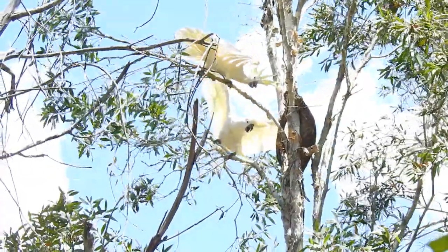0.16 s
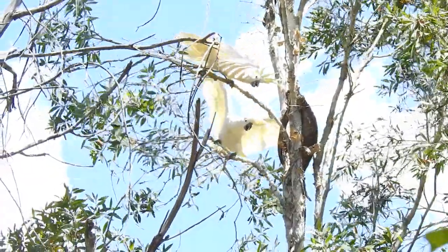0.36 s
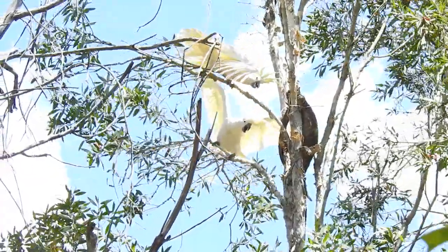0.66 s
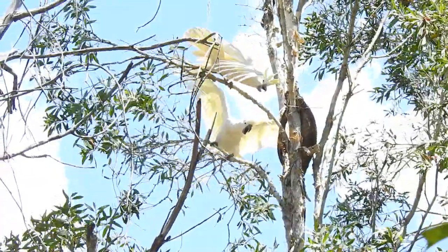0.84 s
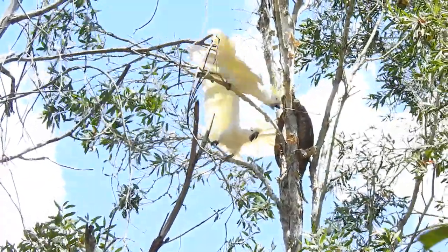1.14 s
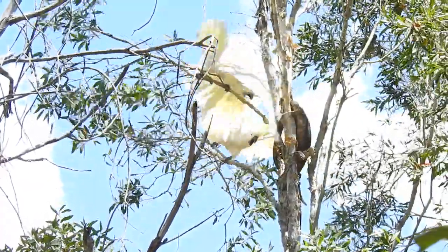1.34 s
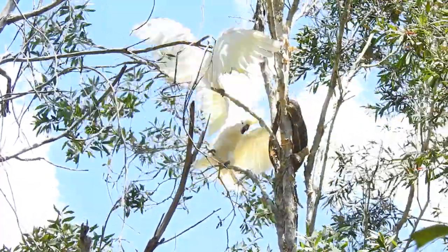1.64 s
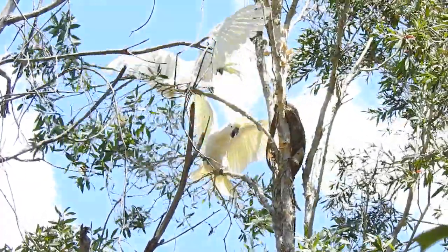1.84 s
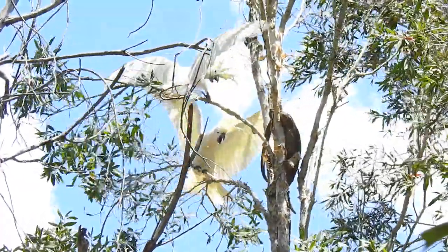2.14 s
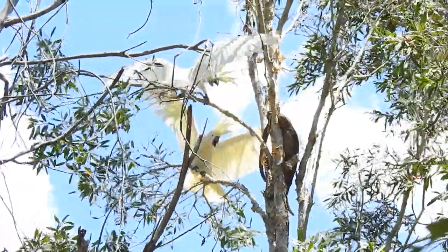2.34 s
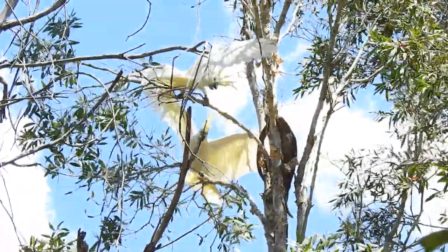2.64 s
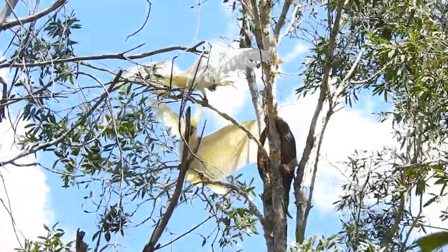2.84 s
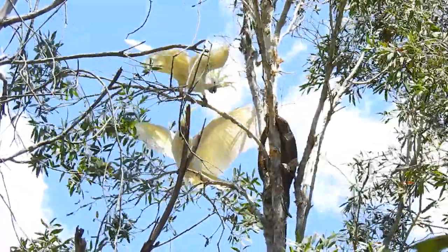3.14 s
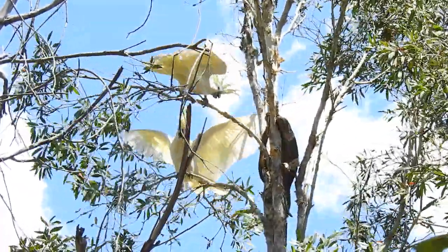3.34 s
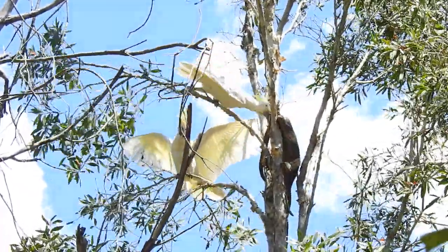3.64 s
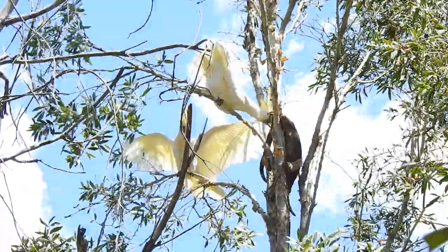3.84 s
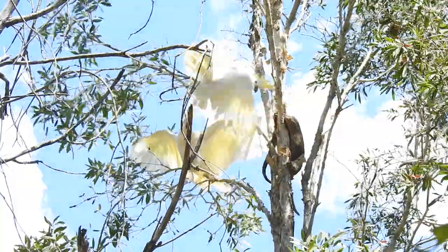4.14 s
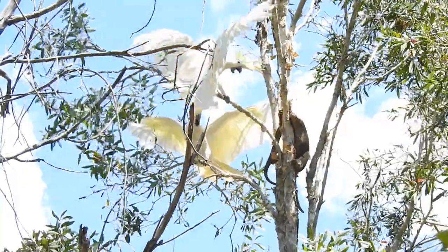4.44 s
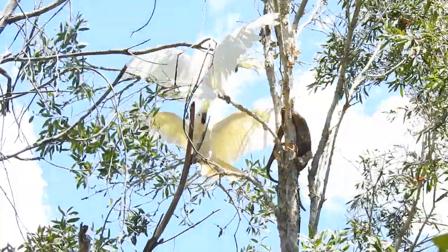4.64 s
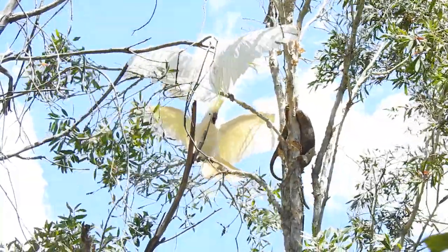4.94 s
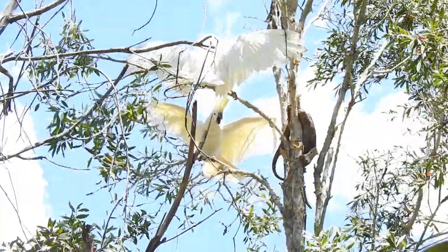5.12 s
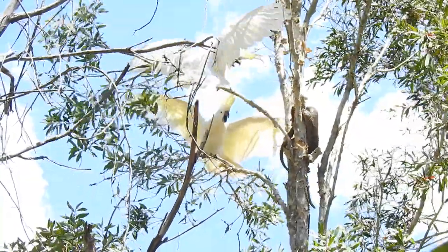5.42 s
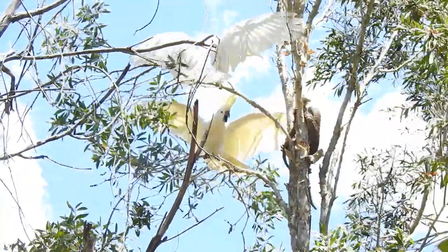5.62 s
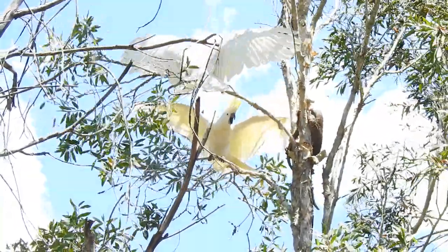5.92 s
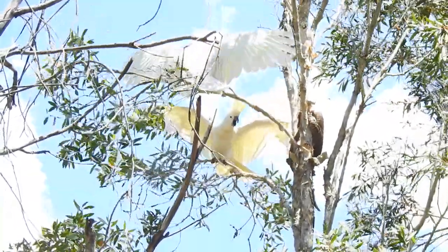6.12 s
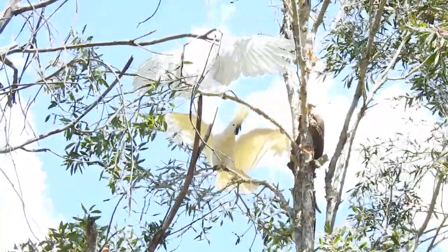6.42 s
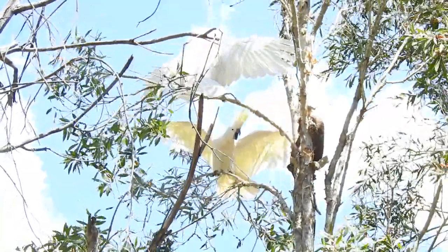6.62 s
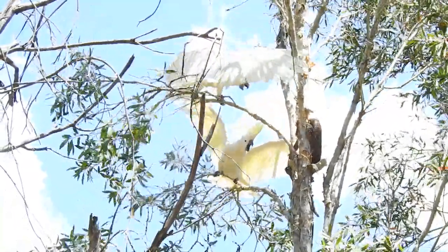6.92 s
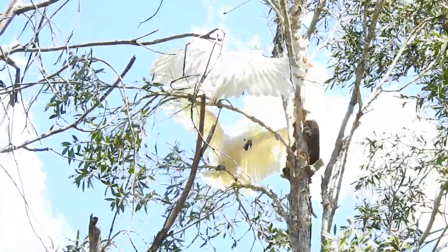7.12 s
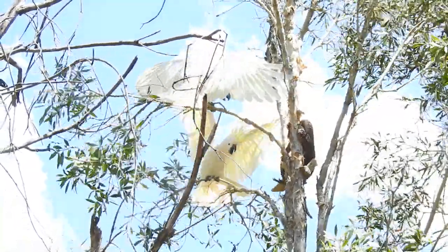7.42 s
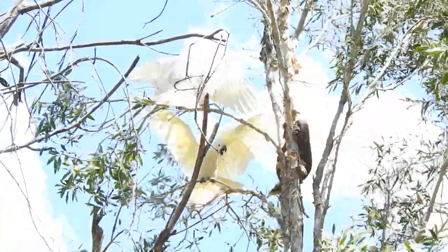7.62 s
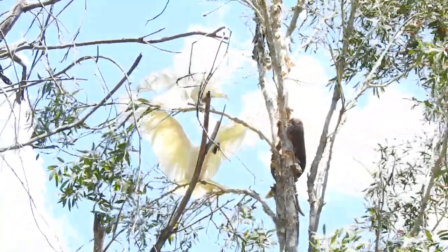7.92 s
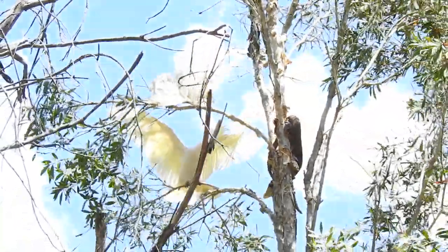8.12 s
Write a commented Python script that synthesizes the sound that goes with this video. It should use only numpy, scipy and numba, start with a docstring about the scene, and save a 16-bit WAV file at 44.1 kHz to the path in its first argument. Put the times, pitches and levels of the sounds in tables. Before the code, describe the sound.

Cockatoos screech loudly in a wood, slightly to the left, with a light echo. A cry cuts off just after the start. From about 0.7 to 3.3 seconds come three harsh screeches back to back, each about a second or less; the first has a duller buzz dipping and rising under it, and the third is a coarser rattle. In the lull, a twig snaps faintly at 4.1 seconds. The longest screech runs from 4.2 to 6.1 seconds, followed by a tiny rasp and two more screeches, from 6.3 to 7.4 and from 7.4 to 8.3 seconds. The calls start with a quick rattle, turn ragged and shrill, and sometimes tighten into a pitched buzz. Faint, distant insect hiss continues throughout. A light breeze rumbles on the microphone, with a few soft bumps between 1.4 and 3.2 seconds.

```python
"""Cockatoos screeching in a wood

Cockatoos screech from a tree at an animal on the trunk. Each screech spins up from a slow rattle into
chaos and now and then locks into a buzz of about 290 snaps a second; each snap of the syrinx rings
windpipe, throat and beak. A breeze buffets the microphone, a twig snaps, the wood echoes, insects hiss
far off, and the loudest peaks overload the microphone."""
import sys
import numpy as np
from scipy import signal
from scipy.fft import rfft, irfft
from scipy.io import wavfile
from scipy.ndimage import uniform_filter1d
from numba import njit

SR = 44100
rng = np.random.default_rng(int(sys.argv[2]) if len(sys.argv) > 2 else 0)


def master(y):
    """Save y as 16-bit WAV."""
    cut = np.clip(np.atleast_2d(y).T, -1, 1)
    pcm = np.round(cut * 32767)  # scale
    wavfile.write(sys.argv[1], SR, pcm.astype(np.int16))


N = 364266
TIME = np.arange(N) / SR

# One row a screech: start_s, end_s, attack_s, level_db, swell_db, snap_rate_hz, spin_up_s, chaos (0-1),
# throat_start_db, throat_end_db, treble_db, shrill_db, throat_scoop_hz, gap_rise_hz.
# Throat, treble and shrill ring are set against the beak band.
SCREECHES = [(-.2, 0.117, 0.028, -18, 6.5, 275.7, 0.039, 0.78, -1, -1.5, 1, -4, 0, 50),
             (.674, 1.667, 0.13, -13.5, -0.5, 302.1, .05, 0.53, -4, -1.5, -2.5, 7.5, 20, 650),
             (1.695, 2.611, 0.064, -14, -.5, 295, .09, 0.67, -3, -0.5, -2.5, 6, -54, 400),
             (2.625, 3.307, 0.084, -13, 1.2, 159.8, 0.045, .7, -2.5, -5, -4, 11.5, -60, 1300),
             (4.181, 6.11, .03, -14, 0.5, 259.8, 0.16, 0.79, 0.14, -1.9, -3.5, -9, 372, 100),
             (6.159, 6.25, 0.058, -34, 0, 258.4, .05, 0.86, -13.5, -8, -2, -5, 0, 3),
             (6.344, 7.369, 0.13, -14, 1.5, 284.4, .05, 0.76, 0.5, -2, -2.5, 5, 25, 152),
             (7.427, 8.298, 0.024, -14.5, 0, 289.7, .28, .66, -1.5, -1.5, -1.5, 4, -56, 200)]


def undb(db):
    """Decibels to gain."""
    return 10 ** (np.asarray(db) / 20)


def unit(x):
    """Scale to rms 1."""
    return x / np.sqrt(np.mean(x ** 2))


def steady(x, size=1300):
    """Hold the rms at 1 over a few dozen milliseconds; single snaps keep their punch."""
    power = uniform_filter1d(uniform_filter1d(x ** 2, size), size)
    return x / np.sqrt(power + 1e-5 * np.mean(x ** 2))


def ramp(start_s, length_s):
    """Rise from 0 to 1."""
    return np.clip((TIME - start_s) / max(length_s, 1e-3), 0, 1)


def curves(table):
    """Automation lanes: a table's columns, joined by straight lines in time."""
    times, *columns = np.transpose(table)
    return [np.interp(TIME, times, column) for column in columns]


def walk(rate_hz):
    """Smooth random modulation with a spread near 1."""
    size = int(SR / rate_hz)
    points = rng.standard_normal(N // size + 2)
    return np.interp(np.arange(N) / size, np.arange(len(points)), points)


def colour(x, points):
    """EQ through (frequency_hz, gain_db) points."""
    hz, db = np.transpose(points)
    gain_db = np.interp(np.log(np.fft.rfftfreq(N, 1 / SR) + 1), np.log(hz), db)
    return irfft(rfft(x) * undb(gain_db), N)


def cut(x, hz, kind, order=2):
    """Low-pass or high-pass."""
    return signal.sosfilt(signal.butter(order, hz, kind, fs=SR, output="sos"), x + 1e-18)


@njit
def svf(x, hz, width_hz):
    """State-variable band-pass whose centre moves."""
    y, band, low = np.empty(len(x)), 0., 0.
    for i in range(len(x)):
        g, damping = np.tan(np.pi * hz[i] / SR), width_hz / hz[i]
        v = (band + g * (x[i] + 1e-18 - low)) / (1 + g * (g + damping))
        band, low, y[i] = 2 * v - band, low + 2 * g * v, damping * v
    return y


def ring(x, hz, width_hz):
    """One resonance, still or moving."""
    return svf(x, hz * np.ones(N), float(width_hz))


def leaves_and_insects(level_db=-40):
    """An even bed of distant hiss, centred in the lows and wide in the highs."""
    # Tone of the bed: frequency_hz, gain_db
    spectrum = [(30, -21), (130, -13.5), (190, -2), (240, -11.5), (320, -4), (650, -8), (1000, -13),
                (4000, -16.5), (6500, -11), (8300, -22.5), (10800, -38), (16000, -66)]
    centre, sides = rng.standard_normal(N), rng.standard_normal((2, N))
    bed = colour(centre + cut(sides, 3400, "high", order=1), spectrum)
    return unit(bed) * undb(level_db + .5 * walk(2.3))


def wind(buffet_s=.016):
    """A breeze rumbles on each microphone port separately, with a few soft buffets."""
    # Strength of the breeze: time_s, level_db
    breeze = [(1, -53), (2.9, -47), (3.3, -48), (3.7, -59.5), (5, -53), (5.8, -57), (7, -53), (8.2, -53)]
    # Thumps of air: time_s, level_db, pitch_hz, left_minus_right_db
    buffets = [(1.44, -34.5, 148, 5), (1.68, -31, 152.6, -8), (1.73, -36, 179, -17), (1.8, -35.5, 185, -4),
               (2.49, -32, 108.3, -7), (3.06, -46, 69.6, 2.5), (3.222, -41, 78, 0)]
    ports = []
    for side in (1, -1):
        air = rng.standard_normal(N)
        rumble = unit(cut(ring(ring(air, 73, 70), 88, 160), 254, "low"))
        rumble *= undb(curves(breeze)[0] + 3.5 * walk(11))
        for time_s, db, hz, pan_db in buffets:
            swell = np.exp(-((TIME - time_s) / buffet_s) ** 2)
            thump = steady(ring(ring(air, hz, 67), hz, 130))
            rumble += undb(db + side * pan_db / 2) * swell * thump
        ports.append(rumble)
    return np.array(ports)


def wood_echo(x, t60_s=.91, tail_db=-14.5, near_db=-4.5, near_s=.01):
    """Nearby twigs scatter the sound at once; trunks further off return a long tail."""
    t = TIME[:SR]
    tail = cut(rng.standard_normal((2, SR)), 9400, "low", order=1)
    tail *= undb(-60 * t / t60_s) * (1 - np.exp(-t / .0016))
    near = cut(rng.standard_normal((2, SR)), 6900, "high") * np.exp(-t / near_s)
    response = undb(tail_db) * unit(tail) + undb(near_db) * unit(near)
    return signal.fftconvolve(x[None], response / np.sqrt(SR), axes=1)[:, :N]


def twig_snap(decay_s=.0064):
    """A twig breaks with a dry tick of bright noise."""
    # The break: time_s, level_db
    ticks = [(4.0797, -33.5)]
    crack = unit(cut(ring(rng.standard_normal(N), 5900, 2460), 7700, "low", order=4))
    return crack * sum(undb(db) * np.exp(-abs(TIME - time_s) / decay_s) for time_s, db in ticks)


def snaps(hz, chaos, jitter, shimmer_db=0):
    """One sharp pulse a cycle; chaos scatters the timing by jitter and the sizes by shimmer."""
    pulses, taps, at = np.zeros(N + 16), np.arange(-7, 9), 8.
    for stretch, size in np.clip(rng.standard_normal((4000, 2)), -2, 2):
        i = int(at)
        if i >= N:
            break
        click = np.sinc(i + taps - at) * np.hanning(len(taps))
        pulses[i + taps] += click * undb(shimmer_db * chaos[i] * size)
        at += SR / hz[i] * np.exp(jitter * chaos[i] ** 2 * stretch)
    return pulses[:N]


def second_tone():
    """A duller buzz dips and rises under the second screech."""
    # Path of the buzz: time_s, pitch_hz, level_db
    slide = [(.9, 324.5, -56), (.97, 307, -26), (1.08, 282.7, -18.5), (1.18, 266.2, -17.5),
             (1.29, 290.3, -18), (1.42, 329.2, -30)]
    hz, db = curves(slide)
    pulses = snaps(hz, chaos=np.full(N, .42), jitter=.347, shimmer_db=4)
    buzz = ring(ring(pulses, 1810, 420), 2200, 1100) + undb(-15.5) * ring(pulses, 740, 360)
    gate = (TIME > slide[0][0]) & (TIME < slide[-1][0])
    return unit(buzz) * undb(db) * gate


def lock_into_buzz(hz, chaos, lock_s=.03, break_s=.018, treble_db=-.5):
    """The syrinx locks: pitch catches first, then chaos dies down and the four bands shift in level."""
    # Locked stretches: start_s, end_s, pitch_hz, glide_hz, chaos (0-1), throat_db, beak_db, windpipe_db
    buzzes = [(0, 0.089, 285, -5.5, 0, -6.5, 2, 5), (0.814, .91, 291.9, 3.5, 0.1, 3, -1.5, 0.5),
              (0.945, 1.096, 292.1, 6, .14, 0.5, 0, 0), (1.123, 1.27, 298.6, 4.5, 0.01, -7, -0.5, -0.5),
              (1.289, 1.425, 301.6, -4.5, 0.14, -2.5, 1, -1.5), (1.809, 1.881, 286.4, 1, 0.2, -2, -0.5, 3),
              (2.09, 2.146, 296.2, -1, 0.18, 2, 1, -3), (2.289, 2.345, 295.2, 0.5, 0.18, 1, -0.5, -3),
              (3.026, 3.083, 288.3, -3.5, 0.03, -2.5, -2.5, 2.5), (4.34, 4.441, 215.7, 1, 0.15, -1, 2, 4),
              (4.731, 4.829, 291, -1, 0.39, 0.5, 0, -0.5), (4.848, 4.95, 290, 0, 0.11, -1, 0, 3),
              (4.983, 5.097, 289.1, -0.46, 0.01, -8.5, -1, 4), (6.462, 6.595, 292.2, 1.5, 0.05, 2, -3, -3),
              (6.757, 6.85, 295.8, 4, 0.16, 0.5, -.5, -0.5), (7.678, 7.726, 295, 2.5, .1, 3, 0.5, -5.5),
              (7.759, 7.848, 290.2, 1, 0.3, 2.5, -0.5, 0.5), (7.879, 8.137, 289.7, 0, 0.19, 0.5, 1, 4)]
    lanes = np.vstack([hz, chaos, np.zeros((4, N))])
    for start, end, pitch_hz, glide_hz, buzz_chaos, *lifts_db in buzzes:
        span = slice(*np.searchsorted(TIME, [start - lock_s, end + break_s]))
        grip = np.interp(TIME[span], [start - lock_s, start, end, end + break_s], [0, 1, 1, 0])
        pitch = np.interp(TIME[span], [start, end], [pitch_hz, pitch_hz + glide_hz])
        lanes[0, span] += np.minimum(2 * grip, 1) * (pitch - lanes[0, span])
        lanes[1:, span] += grip * (np.c_[[buzz_chaos, *lifts_db, treble_db]] - lanes[1:, span])
    return lanes


def syrinx(hz, chaos, rasp=1.3, hiss=.18, wobble=.04, puff_s=.0034):
    """Snaps, each followed by a puff of turbulent air; chaos shakes the pitch and feeds the puffs."""
    pulses = snaps(hz * np.exp(wobble * chaos ** 2 * walk(45)), chaos, jitter=.26)
    fade = np.exp(-1 / (puff_s * SR))
    puffs = signal.lfilter([np.sqrt(1 - fade ** 2)], [1, -fade], pulses) * rng.standard_normal(N)
    return pulses + (hiss + rasp * chaos) * puffs


def flare(x, depth=.54, rate_hz=30):
    """Narrow bands flare and sink, so shreds of tone drift through the rasp."""
    return x + depth * sum(ring(x, hz, 130) * walk(rate_hz) for hz in np.linspace(2300, 7400, num=24))


def windpipe(source, hz, chaos, db_per_octave=3.5):
    """The low body of the voice: weaker in a slow rattle, breaking up as the voice strains."""
    buzz_ring = undb(-1.5) * (1 - chaos) ** 2 * ring(source, 1450, 42)
    body = ring(source, 924, 77) + buzz_ring + undb(-7.5) * ring(source, 1258, 630)
    body = cut(cut(body, 687, "high", order=3), 5200, "low", order=1)
    flutter_db = 2.8 * np.sqrt(chaos) * walk(35)
    return steady(body) * undb(-16 + db_per_octave * np.log2(hz / 290) + flutter_db)


def throat(source, hz, chaos, core_db=2):
    """A broad resonance whose narrow core builds up as the voice clears."""
    core = undb(core_db) * (1 - chaos) * ring(source, hz, 59)
    return steady(ring(ring(source, hz, 298) + core, hz, 1370))


def formants(x, modes, quiver=.036, drift=.021):
    """Resonances that quiver alone and drift together as tongue and beak move."""
    tongue = drift * walk(5)
    return sum(undb(db) * ring(x, hz * np.exp(np.clip(tongue + quiver * walk(16), -.2, .2)), width_hz)
               for hz, width_hz, db in modes)


def beak(source, shrill_db):
    """The beak rings in the upper mids, with a narrow, shrill edge."""
    # Beak resonances: centre_hz, width_hz, gain_db
    modes = [(2628, 393, 12), (3340, 1070, 3)]
    shrill = undb(shrill_db) * ring(source, 3560 * (1 + .012 * walk(14)), 116)
    band = formants(source, modes) + shrill
    return steady(cut(cut(band, 2680, "high", order=4), 3220, "low", order=4))


def beak_treble(source, gap_hz, opening):
    """The top of the voice; the gap of the beak bites hardest as it opens."""
    # Treble resonances: centre_hz, width_hz, gain_db
    modes = [(4480, 480, 14), (4920, 1160, 9.5), (5880, 940, 8), (6460, 450, 8.5), (7840, 620, -39)]
    bite = undb(12.5 + 18 * opening) * ring(source, gap_hz, 490)
    band = formants(source, modes) + bite
    return steady(cut(cut(band, 3540, "high", order=4), 7715, "low", order=8))


def screech_envelope(tire_db=-.5, tire_s=.12, release_db_per_s=333):
    """Each screech attacks, swells or fades while held, tires and is released."""
    envelope = 0
    for start, end, attack_s, db, swell_db, *_ in SCREECHES:
        held_db = db + swell_db * (ramp(start, end - start) - .5) + tire_db * ramp(end - tire_s, tire_s)
        release_db = release_db_per_s * np.maximum(TIME - end, 0)
        envelope += ramp(start, attack_s) ** 1.12 * undb(held_db - release_db)
    return envelope


def cockatoos(rattle_hz=90.01, rattle_chaos=.3598, open_s=.042, close_s=.14, scoop_s=.088, yelp_s=.071):
    """The syrinx spins up and rings windpipe, throat and beak, which opens and closes once a screech."""
    rows = np.array(SCREECHES)
    sounding = np.maximum(np.searchsorted(rows[:, 0], TIME, side="right") - 1, 0)
    (start, end, _, _, _, rate_hz, spin_s, wildness,
     first_db, last_db, bright_db, shrill_db, scoop_hz, rise_hz) = rows[sounding].T
    age = TIME - start
    progress = np.clip(age / (end - start), 0, 1)
    rattle, opening = np.exp(-age / spin_s), np.exp(-age / open_s)
    closing = np.exp(-np.maximum(end - TIME, 0) / close_s)

    hz = rate_hz + (rattle_hz - rate_hz) * rattle
    chaos = wildness + (rattle_chaos - wildness) * rattle
    hz, chaos, throat_db, beak_db, pipe_db, treble_db = lock_into_buzz(hz, chaos)
    chaos = chaos.clip(0, 1)

    throat_hz = 2036 + scoop_hz * np.exp(-age / scoop_s)
    throat_hz *= 1 + .023 * chaos * walk(16)
    throat_db += first_db + (last_db - first_db) * progress
    # a throat that starts high briefly makes the beak ring louder
    beak_db += .0039 * scoop_hz * np.exp(-(age / yelp_s) ** 2)
    treble_db += bright_db - 4.5 * closing  # a half-closed beak is duller
    shrill_db += 3.5 * (opening + closing)  # and rings more shrilly
    gap_hz = 4320 + rise_hz * progress

    source = flare(syrinx(hz, chaos))
    voice = (undb(pipe_db) * windpipe(source, hz, chaos)
             + undb(throat_db) * throat(source, throat_hz, chaos)
             + undb(beak_db) * beak(source, shrill_db)
             + undb(treble_db) * beak_treble(source, gap_hz, opening))
    return voice * screech_envelope()


def scene():
    """The birds a little to the left, inside the echo of the wood."""
    # Balance between the microphone ports: frequency_hz, left_minus_right_db
    balance = [(900, 0.5), (1500, 3.5), (2600, 0), (5500, 0), (7800, 0)]
    tree = cockatoos() + second_tone() + twig_snap()
    direct = np.array([colour(tree, np.array(balance) * [1, side / 2]) for side in (1, -1)])
    return direct + wood_echo(tree) + wind() + leaves_and_insects()


def record(dry, ceiling=.97, top_hz=15900):
    """The highest peaks clip, then a steep low-pass takes off the very top."""
    clipped = np.clip(dry, -ceiling, ceiling)
    return signal.sosfilt(signal.ellip(8, .2, 70, top_hz, fs=SR, output="sos"), clipped)


dry = scene()
out = record(dry)
master(out)
```